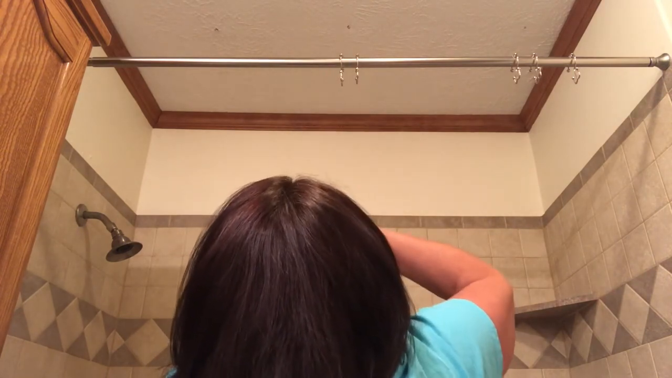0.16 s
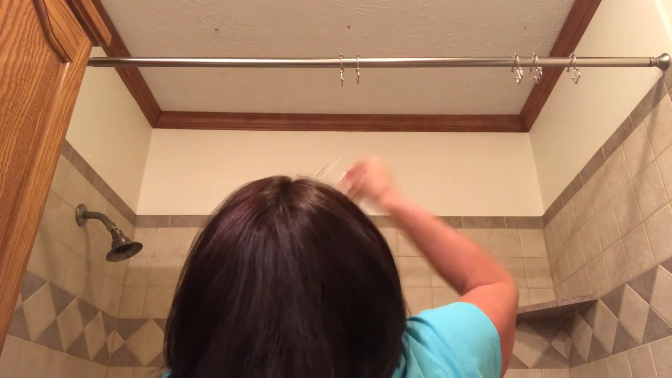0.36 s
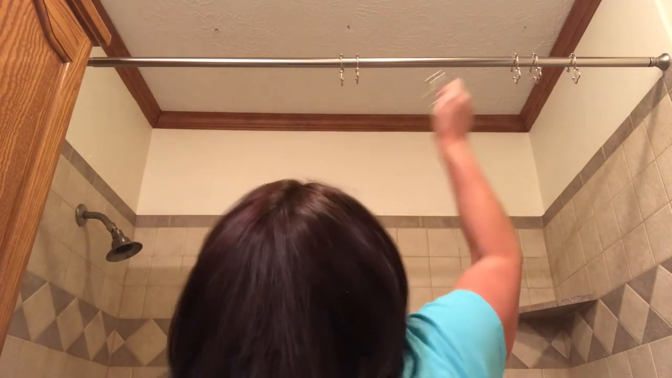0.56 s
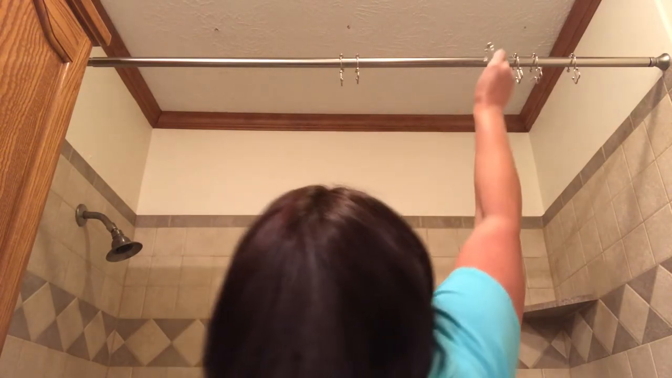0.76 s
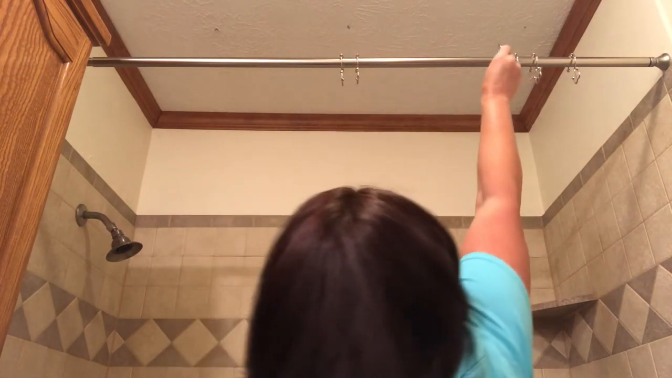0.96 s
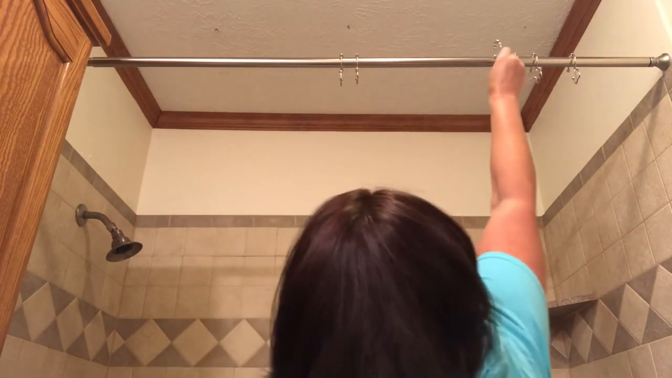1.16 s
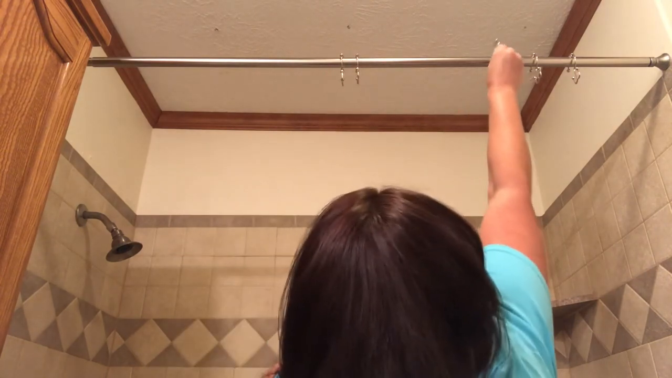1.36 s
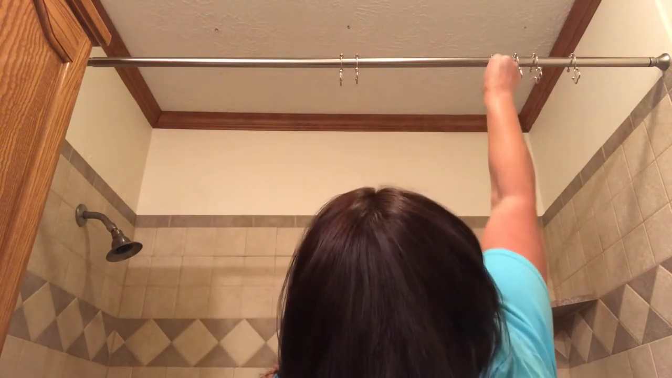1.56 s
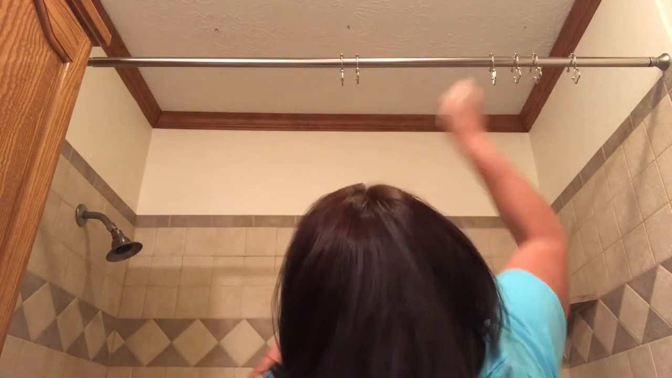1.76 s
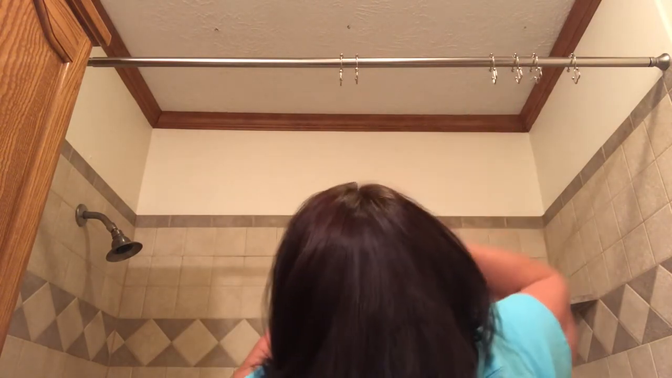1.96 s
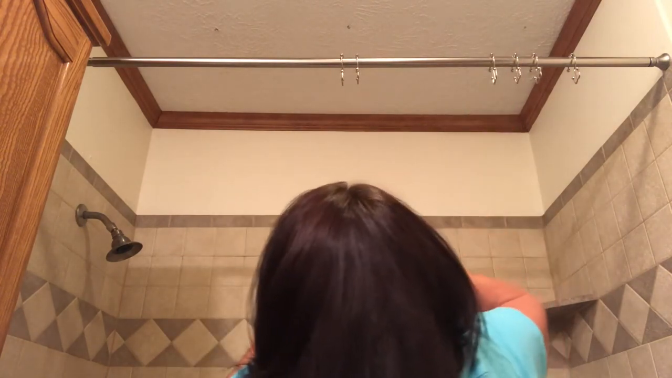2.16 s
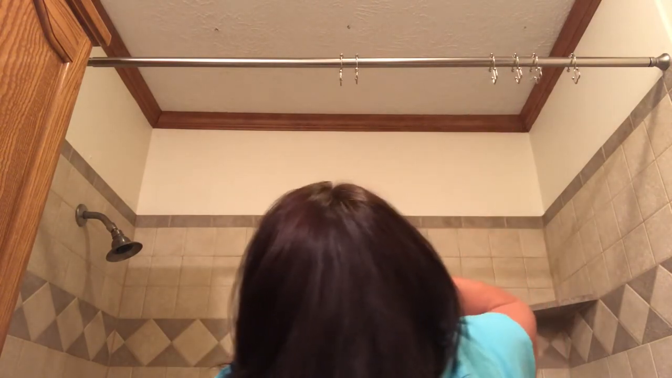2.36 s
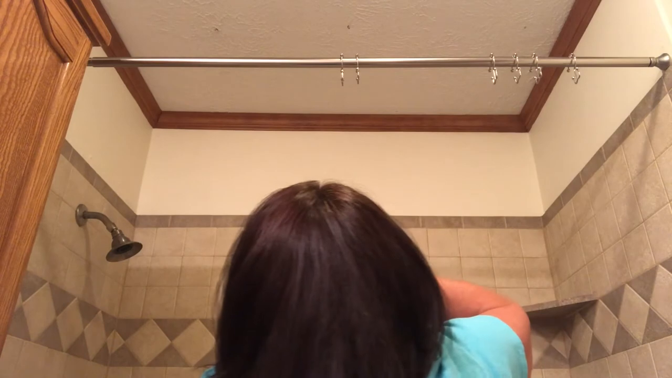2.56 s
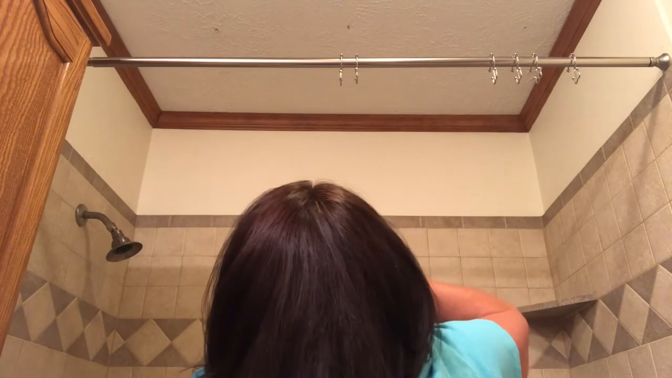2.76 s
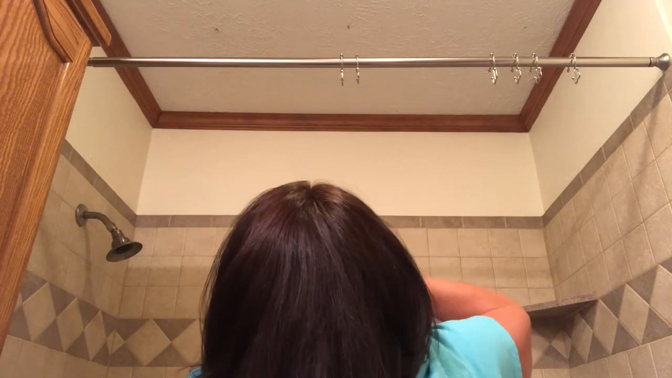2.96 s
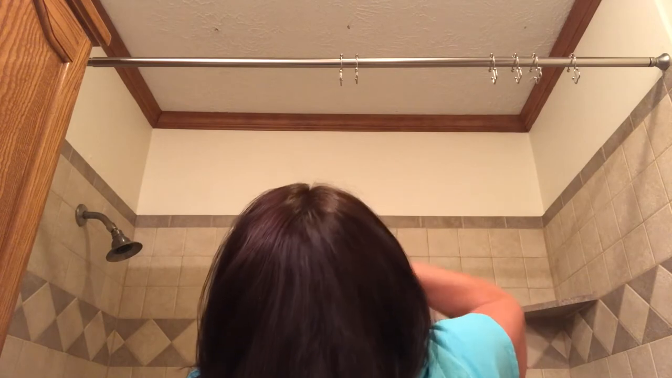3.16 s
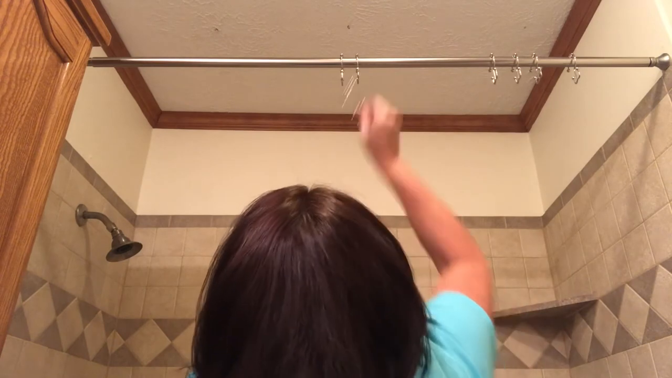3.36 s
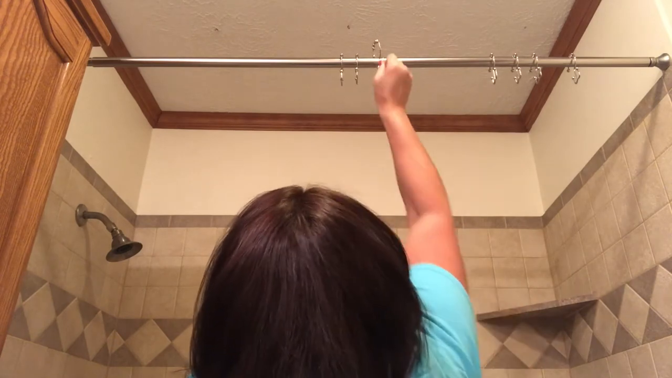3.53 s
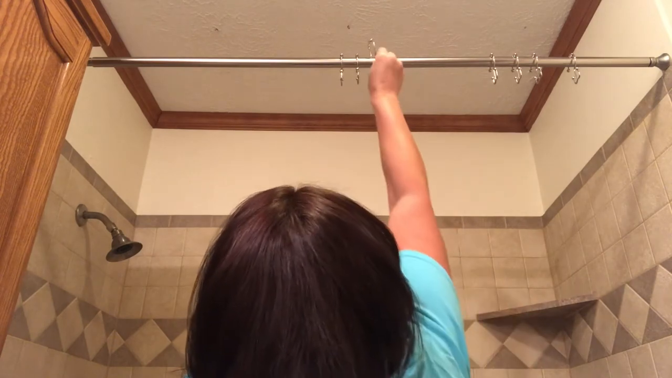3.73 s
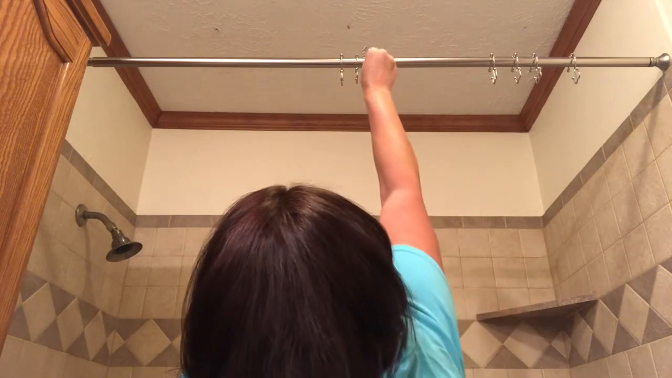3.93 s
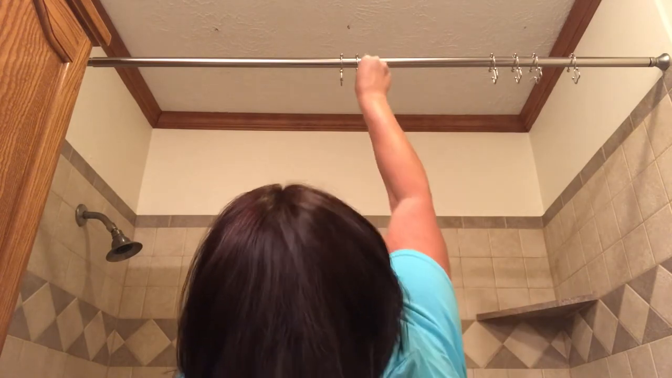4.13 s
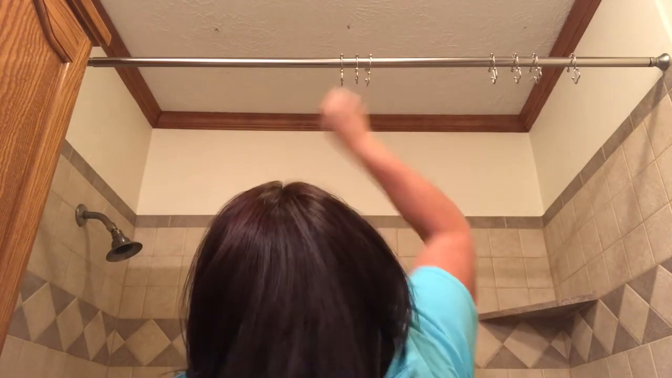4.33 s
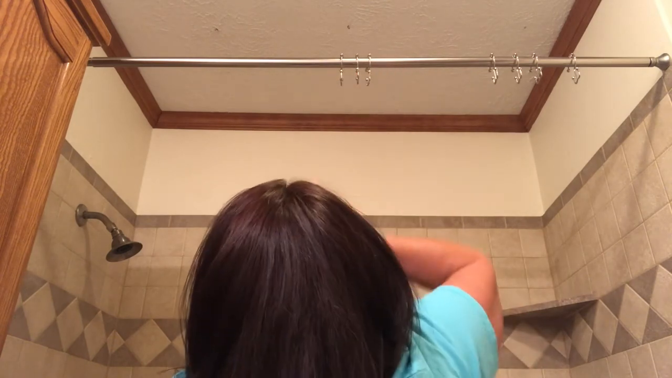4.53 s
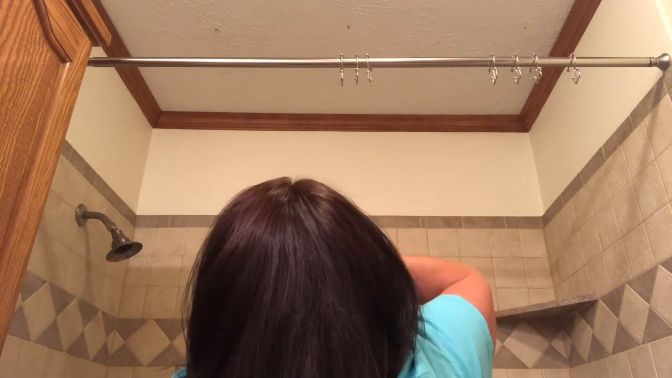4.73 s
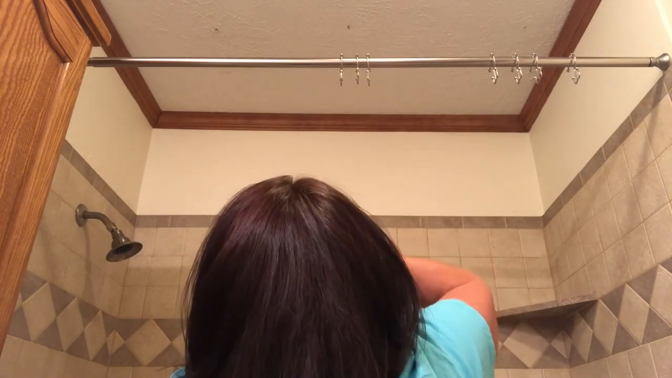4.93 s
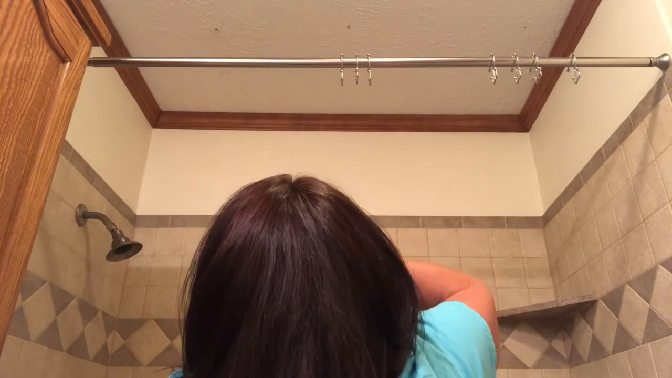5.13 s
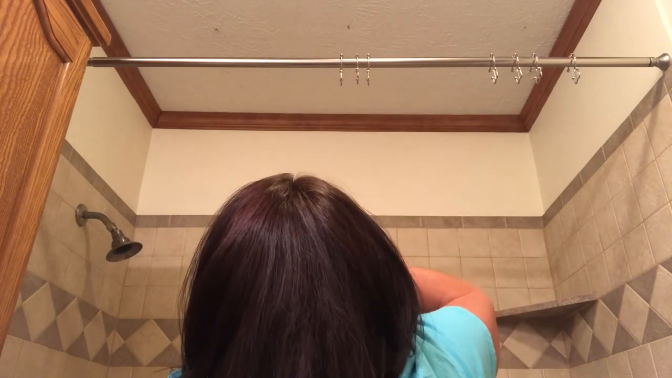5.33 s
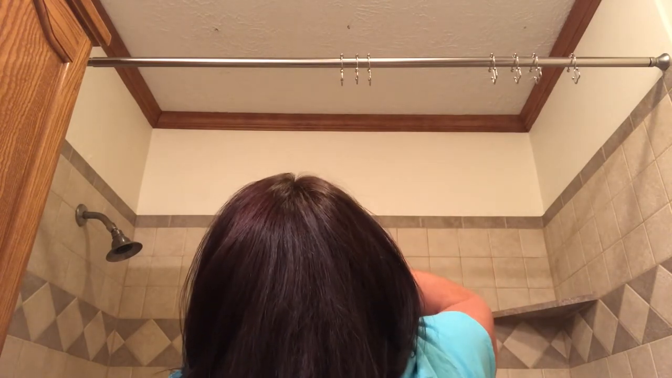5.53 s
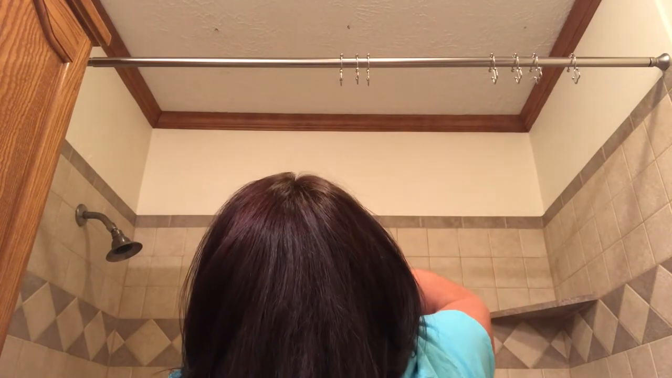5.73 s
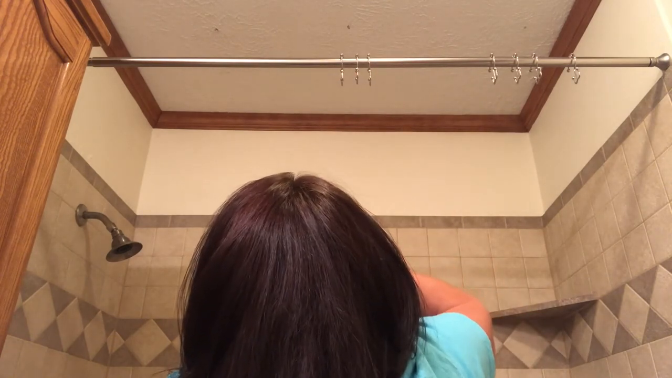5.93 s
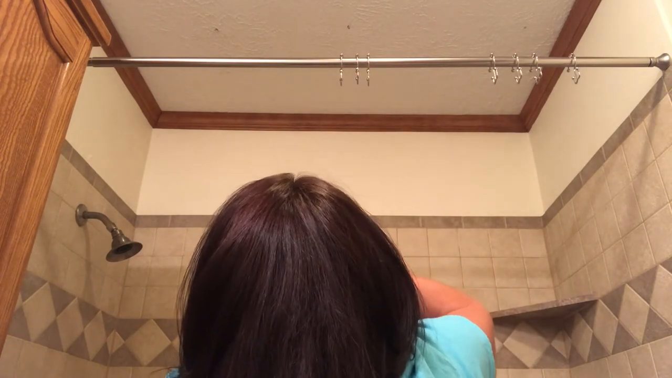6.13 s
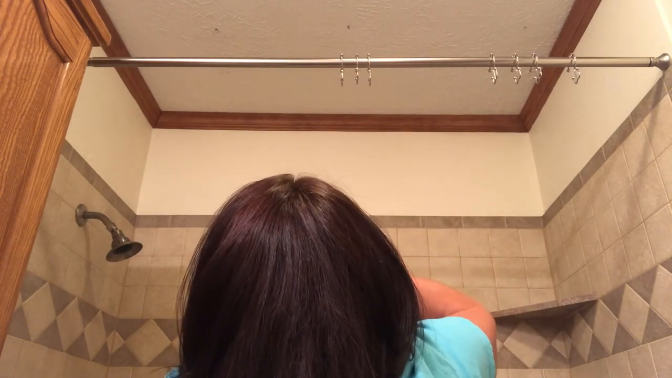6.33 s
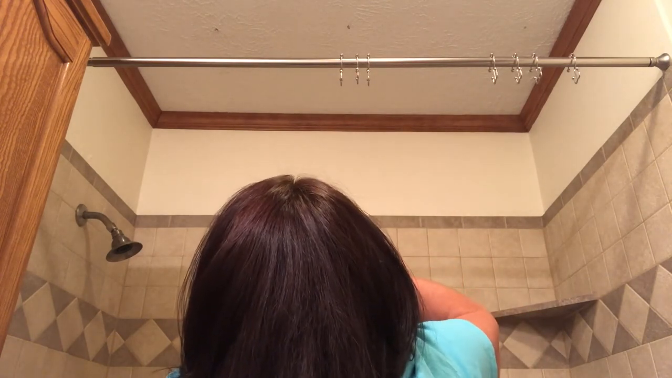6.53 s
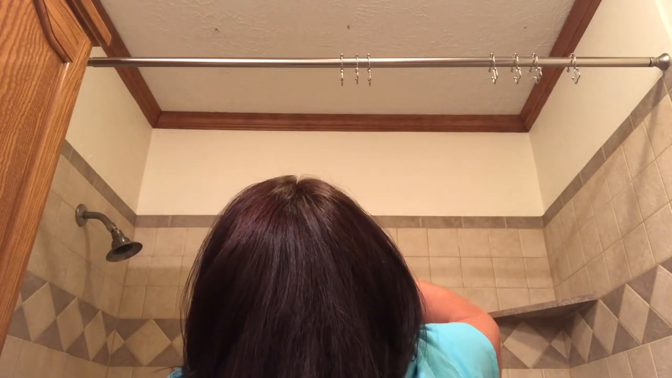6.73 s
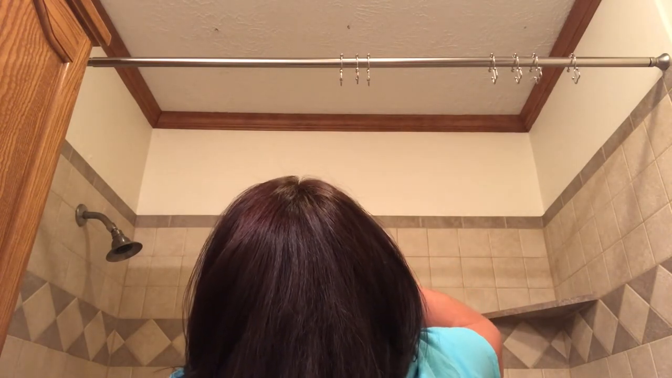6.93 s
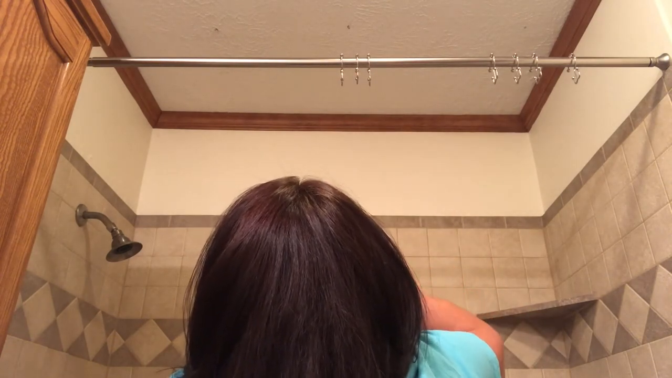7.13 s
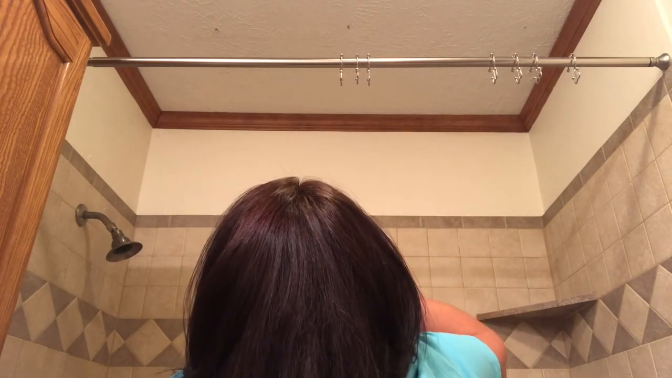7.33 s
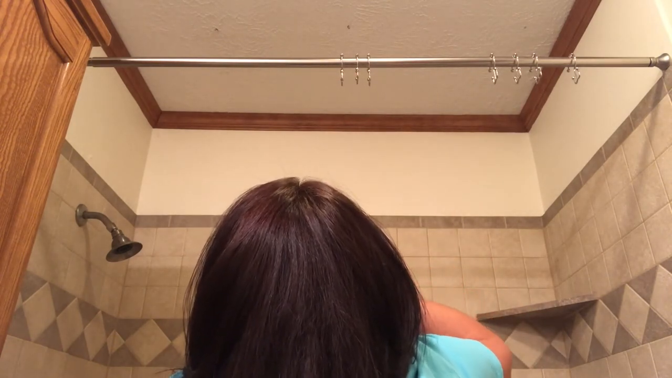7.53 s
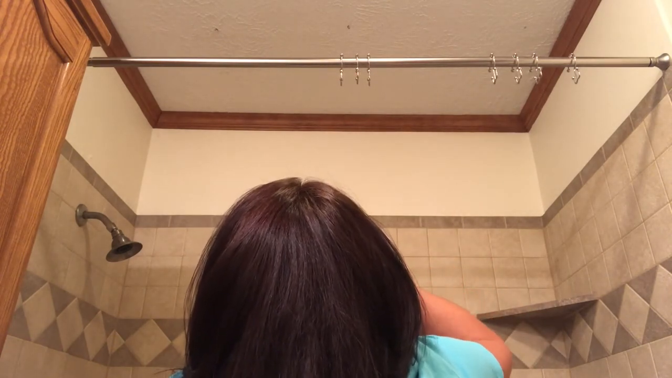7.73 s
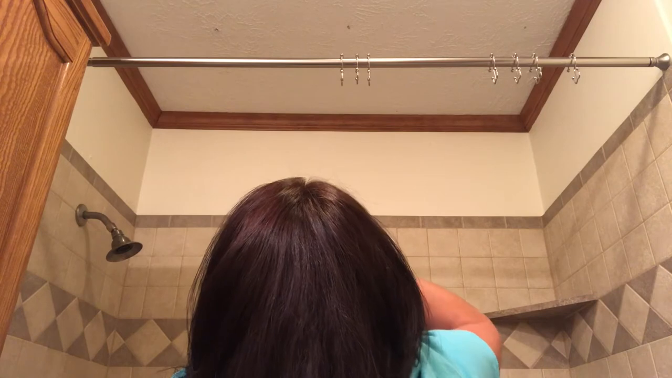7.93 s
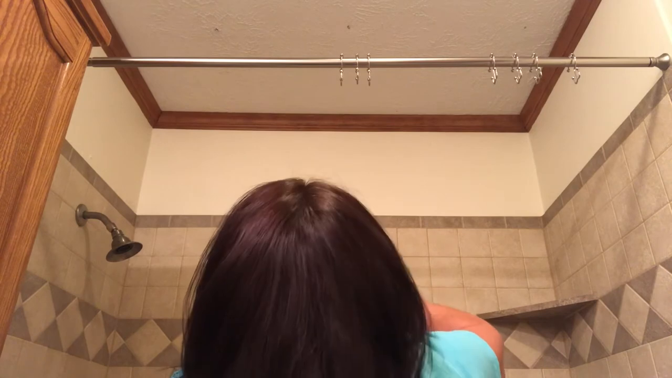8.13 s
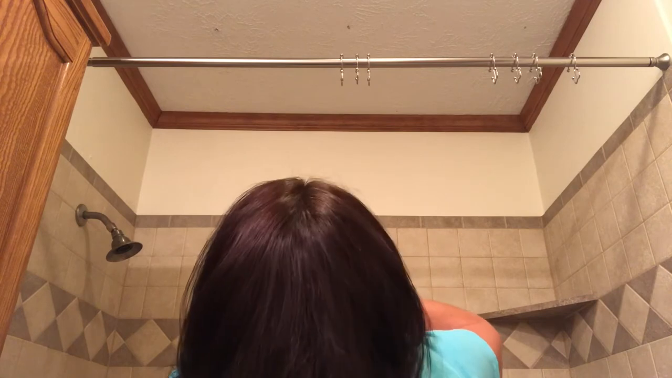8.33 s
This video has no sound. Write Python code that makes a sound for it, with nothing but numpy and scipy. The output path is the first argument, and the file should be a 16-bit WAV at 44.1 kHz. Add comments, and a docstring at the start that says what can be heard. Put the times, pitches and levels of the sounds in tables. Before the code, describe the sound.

Small wire curtain hooks clink onto a hollow metal rod in two brief bursts, with faint bright jingling in the hand throughout a tiled bathroom.

```python
"""Faint clinks of wire curtain hooks fingered in the hand, over a quiet room tone; then hooks drop onto a
hollow metal rod. Cloth brushes past and shifting feet rumble and scuff in the tub.
Contacts: a noise rattle rings a bank of resonances, and a tiled-bathroom tail answers each one.
Body movement and room tone: coloured noise under slow level curves."""
import sys
import numpy as np
from scipy import signal
from scipy.fft import rfft, irfft, next_fast_len
from scipy.io import wavfile
from scipy.ndimage import uniform_filter1d

SR = 44100
rng = np.random.default_rng(int(sys.argv[2]) if len(sys.argv) > 2 else 0)


def to_wav(s):
    """Save 16-bit WAV."""
    ch = np.atleast_2d(s).T  # columns
    pcm = np.round(np.clip(ch, -1, 1) * 32767)  # PCM
    wavfile.write(sys.argv[1], SR, pcm.astype(np.int16))


N = 369558

# room tone spectrum, relative: [f/Hz, density/dB per Hz]
TONE_SPECTRUM = [(24, -51), (40, -11.5), (354, -4.5), (585, -8), (646, -10), (770, -11), (1240, -15.5),
                 (2910, -22), (3560, -22), (5870, -22.5), (11600, -29), (12800, -27.5), (16000, -34)]
# room tone level: [t/s, level/dB]
TONE_LEVEL_CURVE = [(0, -70), (.4, -70), (.85, -67), (1.95, -71.5), (2.5, -67), (2.8, -71.5), (3.4, -68),
                    (4.5, -69.5), (5.598, -71.5), (6.05, -68.5), (6.6, -71.5), (7, -70), (7.4, -72.5),
                    (7.9, -70), (8.38, -68.5)]
# hook touches hook: [t/s, level before gain/dB, low-end tint/dB, rattle/ms,
#   favoured mode 1 f/Hz, favoured mode 2 f/Hz, their lift/dB]
HOOK_CLINKS = [(0.075, -65, -12.5, 3.6, 11750, 13100, 10), (0.192, -70.5, -5.5, 0.84, 3120, 14420, 12),
               (0.38, -70.5, -14, 0.6, 12500, 15000, 5), (0.446, -72, -8, 1, 9030, 14100, 8),
               (0.492, -60.5, -19, 2.9, 6950, 9000, 13.6), (0.611, -66.5, -24, 4.2, 11750, 14100, 8),
               (0.825, -76, 0, 1.1, 11750, 14100, 8), (1.163, -54, -13.5, 7.7, 11750, 14700, 9),
               (1.6, -60, -22, 4, 13100, 15000, 6), (1.71, -62, -13, 3, 11750, 14000, 8.9),
               (1.881, -70, -13, 2.4, 13700, 14700, 6), (1.992, -56, -12.5, 13, 3500, 14950, 3.8),
               (2.142, -53, -14, 6.8, 7740, 11750, 10), (2.276, -68.5, -3, 0.58, 10950, 14420, 6),
               (2.3135, -54.5, -11.5, 2.1, 6350, 6950, 9.9), (2.397, -61, -9, 2.1, 11200, 15000, 8),
               (2.693, -71, -10, 2.4, 10050, 13700, 5.5), (2.948, -78.5, 3.5, 4.3, 7740, 5130, 6),
               (3.007, -66, -17, 5.3, 3140, 13100, 11), (3.035, -59.5, -8.5, 16, 9050, 13100, 7),
               (3.045, -58, -34, 0.4, 13100, 14420, 8.8), (3.076, -52, -14, 6, 11750, 14600, 17),
               (3.092, -53.5, -23, 1.8, 11750, 14300, 11), (3.124, -57, -30, 2.4, 4440, 11750, 16),
               (3.198, -72, -26, 0.7, 13100, 14450, 10), (3.238, -56.5, -17, 2.8, 4460, 11700, 20),
               (3.272, -73, -17, 0.9, 9030, 14100, 11), (3.382, -61.5, -14, 2.7, 7700, 14800, 11),
               (3.445, -64, -31, 1.2, 7700, 14400, 8.2), (3.514, -57, -28, 3.4, 11700, 14420, 11),
               (3.95, -72, -26, 2, 14600, 13100, 6), (4.17, -52.5, -9, 5, 14600, 11200, 7.2),
               (4.415, -70, -34, 2, 13700, 12760, 16), (4.606, -60, -8.5, 4, 11750, 13700, 8),
               (4.632, -57, -11, 1.7, 3750, 7760, 7), (4.776, -59, -17, 3.9, 10100, 14600, 13),
               (4.851, -64, -14, 7.4, 7760, 14600, 9), (4.887, -55.5, -16.5, 8.8, 11750, 14600, 11),
               (4.945, -61.5, -8, 5, 3750, 12500, 6), (5.049, -67, -10, 5.7, 6350, 13700, 5),
               (5.082, -53.5, -9, 5, 14600, 15000, 8), (5.091, -50, -11.5, 3.9, 3520, 15000, 15),
               (5.112, -50.5, -16, 3.5, 9030, 11600, 13), (5.14, -65.4, -19, 1.0, 3520, 9030, 8),
               (5.328, -59, -8.5, 2.1, 13100, 14450, 7), (5.357, -51, -14.5, 0.7, 6350, 8000, 6.8),
               (5.554, -65.5, -3.5, 6.5, 5130, 15100, 4), (5.585, -63, -9, 4.6, 4460, 6660, 6.4),
               (5.88, -57.5, -13.5, 6.3, 3140, 15000, 10), (5.917, -56.5, -4, 1.1, 11700, 14600, 18),
               (6.003, -69, -6, 1.6, 9030, 15000, 7), (6.042, -59, -16, 1.2, 3770, 11750, 12.4),
               (6.072, -50, -16, 4.6, 11700, 14400, 11), (6.159, -60, -2.5, 7.6, 3520, 14420, 7.2),
               (6.172, -47.5, -18, 4.5, 13700, 7900, 6), (6.232, -59.5, -9.5, 1.1, 13100, 15000, 7),
               (6.394, -65.5, -7, 3.2, 10950, 13700, 11), (6.44, -63.5, -13, 2.9, 3140, 10950, 8),
               (6.476, -47.5, -18, 3.7, 11400, 14700, 14), (6.494, -57, -7, 2.7, 1850, 14600, 21),
               (6.738, -56, -11, 7.4, 3140, 11700, 5.6), (6.75, -51, -16.5, 4.7, 2660, 14500, 14.7),
               (6.909, -55.5, -17.5, 3.1, 3750, 14600, 8), (7.087, -59.5, -7.5, 3.1, 3760, 13700, 12),
               (7.205, -64.5, -16, 2.5, 12500, 14700, 13), (7.295, -76, -3.5, 6.2, 7740, 13700, 7),
               (7.373, -56.5, -13, 3.3, 3750, 11750, 5), (7.455, -71, -13, 1.4, 13700, 15000, 8),
               (7.54, -67, -15, 1.8, 6350, 15000, 7), (7.613, -66.5, -12, 1.1, 10950, 12500, 7),
               (7.645, -57, -11, 9.6, 3140, 6950, 5.9), (7.726, -71.5, 11, 1.1, 5130, 14420, 3),
               (7.917, -76, -14, 1.4, 11750, 15000, 9), (7.95, -71.5, -9, 1.8, 12500, 14600, 7.6),
               (7.999, -65.5, -9.5, 2.9, 10950, 13100, 7), (8.066, -64, -0.5, 3.6, 5400, 14420, 4),
               (8.336, -71, -1.5, 2.8, 13700, 15000, 10)]
# bending modes of the wire hooks: [f/Hz, width before grip/Hz, relative level/dB]
HOOK_MODES = [(1860, 49, -12.5), (2660, 43, 0.5), (3140, 60, 1.5), (3515, 40, 5.5), (3770, 39, 3),
              (4412, 110, 5.5), (5360, 29, -10), (5300, 43, -6), (6420, 160, -2.5), (6990, 68, 8),
              (7680, 73, 3), (8000, 55, -6), (9040, 40, 1), (10100, 90, 0.5), (11100, 40, -5),
              (11340, 100, -2), (11730, 76, -0.5), (11400, 44, -0.5), (12500, 55, 1), (12600, 80, -7),
              (13100, 80, -2), (13700, 110, 1), (14200, 72, -1), (14160, 79, 6), (14700, 63, 1),
              (14900, 99, -14.5), (15000, 80, 2.5)]
# room decay: [f/Hz, t60/s]
TILE_DECAY = [(300, 0.68), (800, 0.48), (2000, 0.49), (5500, 0.4), (10000, 0.31), (15000, .25)]
# cloth brushes: [t/s, hold/s, level/dB]
CLOTH_BRUSHES = [(0.37, 0.074, -74), (4.69, 0.026, -54), (4.8, 0.15, -79)]
# cloth spectrum, relative: [f/Hz, density/dB per Hz]
CLOTH_SPECTRUM = [(710, -27), (1200, -9), (2010, -6.5), (2270, -7.5), (3420, -0.5), (5420, -6.5),
                  (10000, -23), (13000, -57), (22000, -120)]
# weight shifts driving the lowest room modes: [t/s, hold/s, level/dB]
TUB_BOOMS = [(2.99, 0.091, -65), (3.24, .1, -72.5), (3.53, 0.11, -76), (4.25, 0.034, -71), (4.79, 0.1, -54),
             (5.04, 0.07, -58.5)]
# foot scuffs in the tub: [t/s, hold/s, level/dB]
TUB_SCUFFS = [(2.24, 0.025, -64), (2.93, 0.035, -70), (3.11, 0.018, -71), (4.7, 0.11, -56.5),
              (4.9, 0.095, -59)]
# scuff spectrum, relative: [f/Hz, density/dB per Hz]
SCUFF_SPECTRUM = [(53, -52), (90, -7), (269, 2), (336, -9), (599, -7.5), (674, -9), (1500, -23.5),
                  (1950, -51), (3300, -120)]
# hook lands on rod: [t/s, level before gain/dB, thud tint/dB, low tint/dB, treble tint/dB, rattle/ms,
#   favoured mode 1 f/Hz, favoured mode 2 f/Hz, their lift/dB]
ROD_BLOWS = [(0.912, -32, -62, -16.5, -2, 0.91, 2540, 4560, 15.2),
             (0.955, -39.5, -21, -9.5, -9, 0.82, 2540, 1152, 8.2),
             (1.267, -37, -40, -9.5, -10, 1.28, 3307, 4020, 13.6),
             (1.349, -33.5, -27.5, -10, -2, 2.6, 5000, 7360, 15),
             (1.4, -46.5, -7, -9, -16, 1.4, 3900, 15500, 9),
             (1.482, -36, -18.5, -1.5, 6, 2.7, 5300, 7780, 13),
             (1.53, -39.5, -25, -24, -2, 1.43, 3170, 3600, 19),
             (3.6435, -32.5, -28.5, -12.5, -7, 0.99, 4650, 9700, 5.5),
             (3.7835, -37, -19.5, -12, -8, 2.61, 3200, 4700, 3.3),
             (3.83, -59, -4, -13, -13, 0.5, 3920, 4640, 9),
             (4.0035, -36.5, -16, -3, 5.5, 1.65, 3180, 7720, 7.1),
             (4.113, -39.5, -34, -13.5, -18.5, 2.1, 2230, 3540, 7.8),
             (4.319, -50.5, -18, -5.5, -7, 3.3, 7720, 2220, 10)]
# modes of the tube: [f/Hz, width before grip/Hz, relative level/dB]
ROD_MODES = [(461, 45, 5), (1175, 44, 5.5), (1285, 14, -17), (1650, 80, 3), (2193, 26, -0.5),
             (2540, 65, -4.5), (3203, 26, 4.5), (3286, 70, -2), (3576, 83, -8.5), (3894, 32, 6),
             (3850, 57, -10), (4320, 59, 6.5), (4670, 18.3, 3), (4907, 83, 6), (5287, 61, 4.5),
             (5290, 130, 3), (6210, 50, -0.5), (6600, 46, -11.5), (7360, 70, -9.5), (7730, 32, -1),
             (7990, 58, 4), (8940, 33, 7.5), (9560, 70, 6.5), (10270, 170, 2.5), (11040, 90, -10.5),
             (12500, 90, -6), (12500, 87, 5.5), (13660, 80, 1), (14900, 90, 0), (15500, 90, 11.5)]

BOOM_HZ, BOOM_WIDTH_HZ = 62.1, 10.2  # lowest room mode
OVERTONE_HZ, OVERTONE_WIDTH_HZ, OVERTONE_DB = 130, 20, -12.5
# (rise, fall) in dB/s
CLOTH_SLOPES, BOOM_SLOPES, SCUFF_SLOPES = (570, 133), (220, 95), (760, 170)
MIDDLE_PER_LOW, MIDDLE_DB = 0.81, 6.5  # the middle of a clink follows its low end
DETUNE = 0.012  # relative pitch scatter: no two hooks, grips or places on the rod ring quite alike
LOW_LIFT = 0.35  # share of a contact's dullness that a favoured mode escapes
SPOT_WIDTH = 0.015  # reach of a favoured mode, in ln(f)
CONTACT_SAMPLES = 2 ** 15
LEAD_SAMPLES = 64  # colouring spreads a little ahead of the contact
TOP_HZ = 15900


def amp(db):
    """dB to amplitude ratio."""
    return 10 ** (np.asarray(db) / 20)


def unit(x):
    """Scale to rms 1."""
    return x / np.sqrt(np.mean(np.abs(x) ** 2) + 1e-20)


def along(points, hz):
    """Interpolate (Hz, value) points on a log-frequency axis."""
    point_hz, value = np.transpose(points)
    return np.interp(np.log(hz + 1), np.log(point_hz + 1), value)


def filtered(x, response):
    """Multiply the spectrum of x by a response of frequency."""
    size = next_fast_len(N + SR // 2)
    spectrum = rfft(x, size) * response(np.fft.rfftfreq(size, 1 / SR))
    return irfft(spectrum, size)[..., :N]


def noise(spectrum):
    """Coloured noise of rms 1."""
    return unit(filtered(rng.standard_normal(N), lambda hz: amp(along(spectrum, hz))))


def room_tone():
    """Distant house noise and microphone hiss: coloured noise under a slow level curve."""
    s, db = np.transpose(TONE_LEVEL_CURVE)
    return amp(np.interp(np.arange(N) / SR, s, db)) * noise(TONE_SPECTRUM)


def resonance(f, hz, width_hz):
    """Second-order resonance, gain 1 at its peak."""
    return 1j * f * width_hz / (hz * hz - f * f + 1j * f * width_hz)


def tiles(build_s):
    """Spectrum of a fresh energy-1 room tail: echoes thicken, then each frequency dies at its own speed."""
    hz, t, cells = signal.stft(rng.standard_normal(CONTACT_SAMPLES * 3 // 4), SR, nperseg=256)
    decay = amp(-60 * t / along(TILE_DECAY, hz)[:, None])
    tail = signal.istft(cells * decay, SR, nperseg=256)[1]
    tail *= 1 - np.exp(-(np.arange(len(tail)) / SR / build_s) ** 2)
    return rfft(tail / np.linalg.norm(tail), CONTACT_SAMPLES)


def contacts(events, modes, grip, colour, spiky_db, ring_db, scatter_db, wet_db, build):
    """A short rattle of tiny ticks rings the modes, damped by the grip (width factor), in the room."""
    out = np.zeros(N + CONTACT_SAMPLES)
    f = np.fft.rfftfreq(CONTACT_SAMPLES, 1 / SR)
    t = np.arange(CONTACT_SAMPLES // 8) / SR
    hz, width_hz, level_db = np.transpose(modes)
    sign = (-1.) ** np.arange(len(hz))
    for s, db, *tint, ms, first_hz, second_hz, lift_db in events:
        tint_points = colour(*tint)
        peak_s = max(ms, .3) / 1000
        ticks = amp(spiky_db * np.repeat(rng.standard_normal(len(t) // 16), 16))
        rattle = rng.standard_normal(len(t)) * ticks * t / peak_s * np.exp(-t / peak_s)
        # where the metal is struck picks its modes
        near_db = 0
        for spot_hz in (first_hz, second_hz):
            spot_lift_db = lift_db - LOW_LIFT * along(tint_points, spot_hz)
            near_db = near_db + spot_lift_db * np.exp(-(np.log(hz / spot_hz) / SPOT_WIDTH) ** 2)
        # lifted modes scatter less in pitch and level
        pitch_hz = hz * (1 + DETUNE * rng.standard_normal(len(hz)) / amp(near_db))
        scatter = rng.normal(0, scatter_db, len(hz)) / amp(near_db / 2)
        mode_gain = sign * amp(ring_db + level_db + near_db + scatter)
        ring = mode_gain @ resonance(f, pitch_hz[:, None], grip * width_hz[:, None])
        # the direct ring starts at the rattle's peak
        direct = rfft(rattle / np.linalg.norm(rattle), CONTACT_SAMPLES)
        direct = direct + ring * np.exp(-2j * np.pi * f * peak_s)
        sound = direct + amp(wet_db) * (1 + ring) * tiles(build * peak_s)
        lead = np.exp(-2j * np.pi * f * LEAD_SAMPLES / SR)
        start = round(s * SR) - LEAD_SAMPLES
        out[start:start + CONTACT_SAMPLES] += amp(db) * irfft(sound * amp(along(tint_points, f)) * lead)
    return out[:N]


def hooks():
    """Thin wire radiates little bass; its bending modes stand high."""
    def colour(low):
        middle = MIDDLE_PER_LOW * low + MIDDLE_DB
        return [(400, low - 16), (1200, low - 1), (2500, low + 5), (5500, middle),
                (8500, middle / 2 - 1.5), (11000, 0.096), (16000, 0.81)]
    return amp(26) * contacts(HOOK_CLINKS, modes=HOOK_MODES, grip=0.96, colour=colour, spiky_db=10,
                              ring_db=-0.5, scatter_db=4.5, wet_db=4.5, build=1.4)


def swells(events, slopes):
    """Level curve: each movement rises, holds and dies away in dB; about 20 ms smoothing."""
    t = np.arange(N) / SR
    rise, fall = slopes
    total = np.zeros(N)
    for s, hold_s, db in events:
        before_s = np.maximum(s - t, 0)
        after_s = np.maximum(t - s - hold_s, 0)
        total += amp(db - rise * before_s - fall * after_s)
    return uniform_filter1d(total, size=900)


def cloth():
    """A sleeve brushes past: broadband friction noise."""
    return swells(CLOTH_BRUSHES, CLOTH_SLOPES) * noise(CLOTH_SPECTRUM)


def feet():
    """Weight shifting in the tub drives the lowest room modes and scuffs."""
    def room_modes(f):
        lowest = resonance(f, BOOM_HZ, BOOM_WIDTH_HZ) ** 2
        overtone = resonance(f, OVERTONE_HZ, OVERTONE_WIDTH_HZ) ** 2
        return lowest + amp(OVERTONE_DB) * overtone
    rumble = unit(filtered(rng.standard_normal(N), room_modes))
    booms = swells(TUB_BOOMS, BOOM_SLOPES) * rumble
    scuffs = swells(TUB_SCUFFS, SCUFF_SLOPES) * noise(SCUFF_SPECTRUM)
    return booms + scuffs


def rod():
    """The tube rings broadly from 1 kHz up and thuds in its wall mounts."""
    def colour(thud, low, treble):
        return [(100, thud), (400, thud + 10), (800, low + 2), (1300, low + 6), (2000, low / 2),
                (4500, 0.0073), (11000, treble - 2), (16000, treble - 4)]
    return amp(27) * contacts(ROD_BLOWS, modes=ROD_MODES, grip=1.41, colour=colour, spiky_db=3.5,
                              ring_db=2.5, scatter_db=4.0, wet_db=5.5, build=2.2)


def scene():
    """Sum of all sources, one channel."""
    return (room_tone() + hooks() + cloth() + feet() + rod())[None]


def record(dry):
    """Steep low-pass at the band limit."""
    return filtered(dry, lambda hz: 1 / (1 + (hz / TOP_HZ) ** 120))


dry = scene()
out = record(dry)
to_wav(out)
```